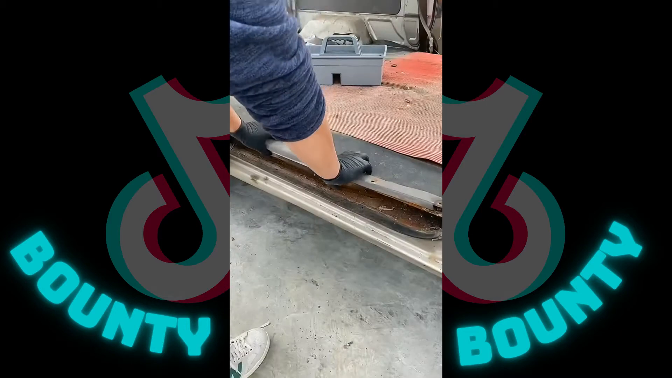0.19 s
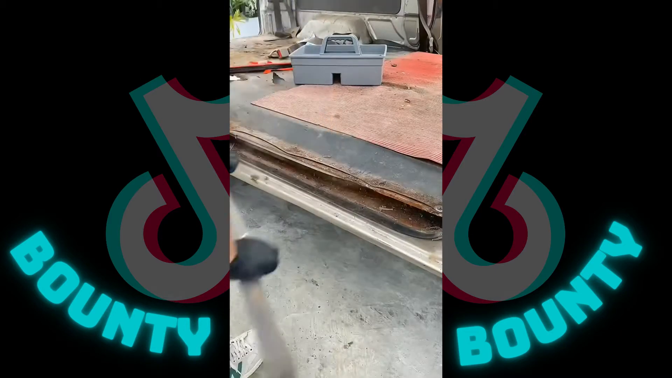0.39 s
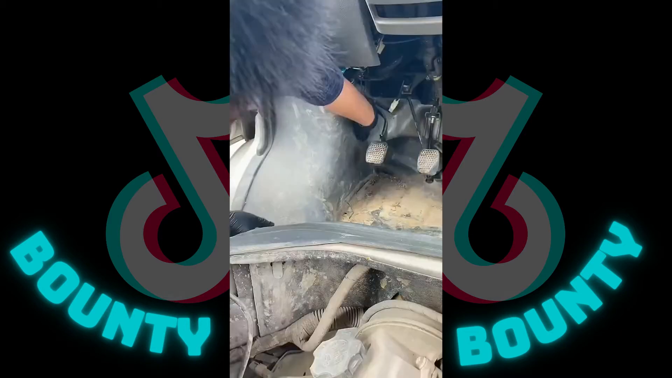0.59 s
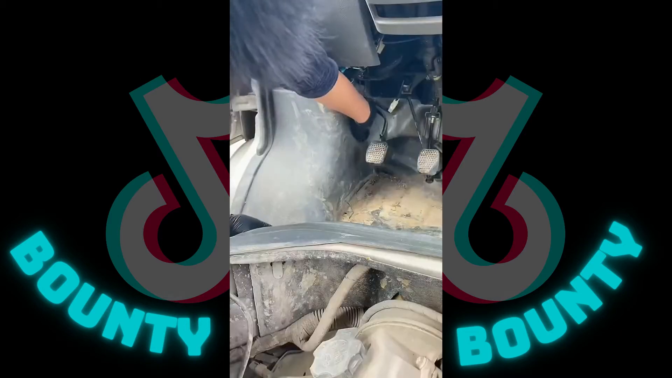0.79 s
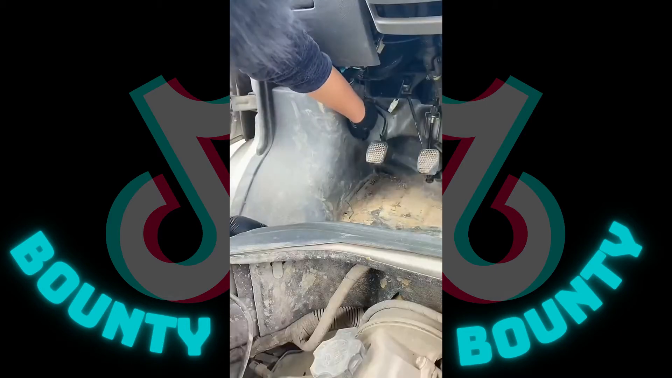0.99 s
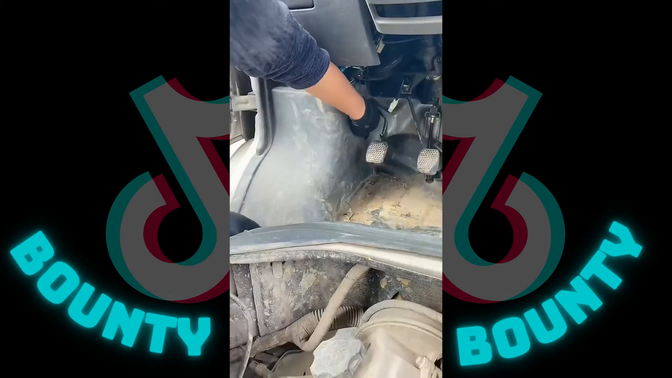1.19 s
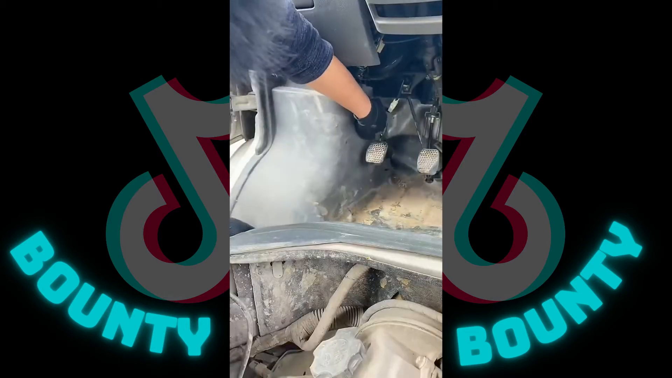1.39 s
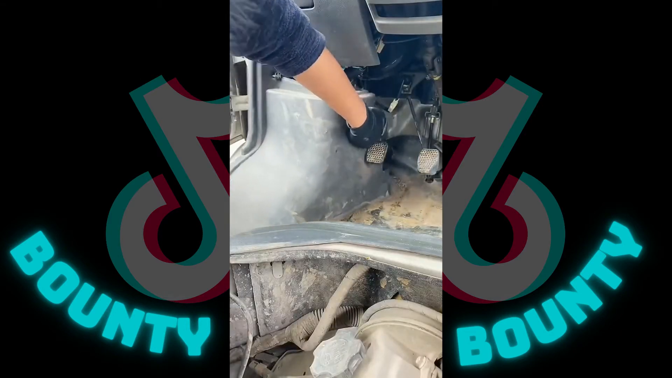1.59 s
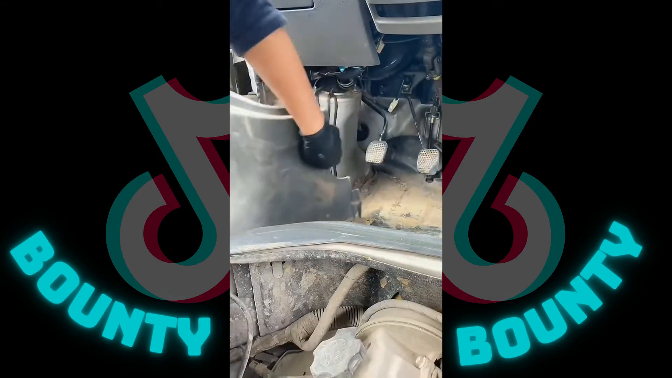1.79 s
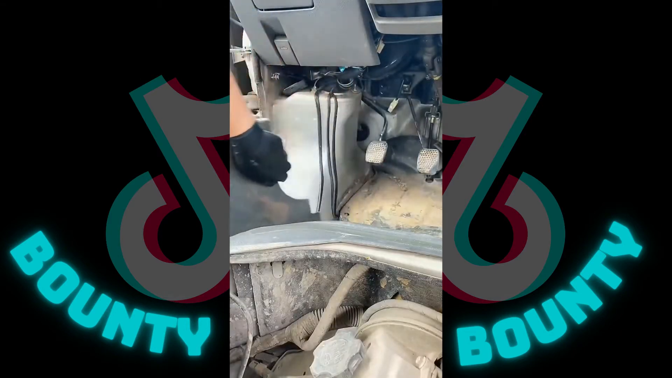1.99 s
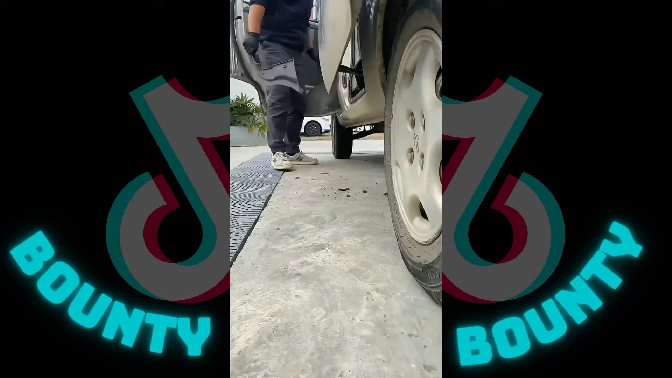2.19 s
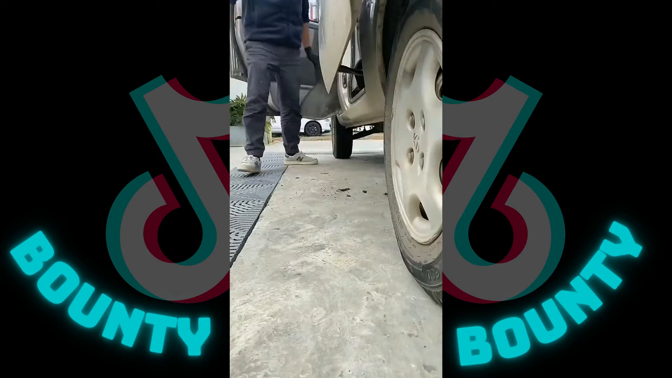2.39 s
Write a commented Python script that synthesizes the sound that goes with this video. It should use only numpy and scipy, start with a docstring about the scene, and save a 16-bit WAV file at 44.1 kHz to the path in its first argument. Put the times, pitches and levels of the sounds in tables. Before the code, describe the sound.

Close phone microphone, three abrupt cuts: hard clacks and a snap from a sill strip, faint scraping before a louder hollow rattle of a freed panel, then a quiet falling boom over low traffic rumble.

```python
"""Three quick shots by a van, heard close, in 2.4 s. First a rusty sill strip is dragged and wrenched off; next a
footwell panel is worked loose with knocks and scraping, then rings hollow once free; last, outdoors, a large
panel is set down on concrete with a boom falling in pitch. Knocks and scraping are noise-like swarms of contacts
filtered by each object's resonances, with sine pings, hums, cracks and creaks; low traffic rumble lies underneath."""
import sys
import numpy as np
from scipy import signal
from scipy.fft import rfft, irfft
from scipy.io import wavfile
from scipy.ndimage import uniform_filter1d

SR = 44100
rng = np.random.default_rng(int(sys.argv[2]) if len(sys.argv) > 2 else 0)


def int16_out(signal):
    """Quantize to a 16-bit WAV file."""
    q = np.round(np.clip(np.atleast_2d(signal).T, -1, 1) * 32767)
    wavfile.write(sys.argv[1], SR, q.astype(np.int16))


N = 105840
STRIP_END_S, PANEL_END_S = .535, 1.985  # the shots change here

# Knocks on the sill strip: (time [s], clack level [dB], thud level [dB], tick level [dB], ping pitch [Hz],
# hum pitch [Hz], attack time constant [s], clack decay to -60 dB [s]); every knock table has these columns
STRIP_KNOCKS = [(0.022, -44.5, -40, -56, 940, 700, 0.0016, 0.12),
                (0.157, -35.5, -36, -44, 910, 490, 0.0034, 0.19),
                (0.185, -37.5, -32.5, -45.5, 2980, 416, 0.0042, 0.34),
                (0.208, -22.5, -22.5, -30, 3190, 410, 0.018, 0.13),
                (0.231, -9, -23, -13.5, 3220, 436, 0.0068, 0.044),
                (0.238, -13.5, -17.5, -31, 1046, 483, 0.00034, 0.16),
                (0.263, -15, -27.5, -27.5, 970, 560, 0.00085, 0.072),
                (0.39, -17.5, -25.5, -33, 1648, 373, 0.003, 0.17),
                (0.425, -15, -25.5, -40.5, 1210, 387, 0.0037, 0.059),
                (0.437, -18.5, -37, -21, 1596, 380, 0.00091, 0.069),
                (0.463, -24.5, -39, -40.5, 1494, 440, 0.0067, 0.071)]
# Scraping of the strip: (time [s], clack level [dB], thud level [dB], tick level [dB], air level [dB]),
# one level per band; every rub table has these columns
STRIP_RUB = [(0.0, -52, -46, -64, -93), (0.174, -66.5, -57, -67.5, -73.5), (0.222, -53.5, -25, -48.5, -86),
             (0.33, -51.5, -36, -58, -64.5), (0.372, -55, -44, -58.5, -63), (0.47, -37, -51.5, -62.5, -73),
             (0.535, -54.5, -33.5, -61, -68)]
# Broad radiation of the strip: (frequency [Hz], density [dB per Hz])
STRIP_COLOUR = [(100, -29.5), (170, -9.5), (260, -11.5), (400, -17.5), (800, -13), (1200, -8),
                (3200, -12.5), (8000, -16)]
# Resonances of the strip: (frequency [Hz], width [Hz], level [dB])
STRIP_MODES = [(162, 45, -8), (342, 98, -8.5), (417, 52, -2.5), (1174, 260, -5.5), (1636, 30, -5),
               (2520, 700, -11), (3186, 140, -8), (4200, 88, -16.5)]


def strip():
    """Forced vibration: knocks and friction excite the modes of the sill strip."""
    return handled(STRIP_KNOCKS, STRIP_RUB, STRIP_COLOUR, STRIP_MODES,
                   ring_db=0.5, air_db=-11.5, start=-1, end=STRIP_END_S)


LOOSE_S = 1.2  # the panel pops free and rings hollow from here
# Knocks on the footwell panel, held and loose: columns as for the strip's knocks
PANEL_KNOCKS = [(0.719, -36, -45, -51, 1540, 214, 0.0024, 0.068),
                (0.811, -36, -40, -44.5, 1030, 513, 0.0036, 0.082),
                (0.828, -36.5, -35, -42.5, 3300, 650, 0.0022, 0.097),
                (0.905, -41.5, -40.5, -79, 1210, 163, 0.0021, 0.044),
                (0.966, -39, -37, -59, 1380, 670, 0.0013, 0.12),
                (0.998, -26.5, -24, -44, 2950, 736, 0.0013, 0.11),
                (1.014, -25, -38, -43, 1266, 173.5, 0.0012, 0.048),
                (1.128, -41.5, -49, -38.5, 1500, 166, 0.003, 0.041),
                (1.204, -11.5, -27.5, -26.5, 1577, 742, 0.0029, 0.079),
                (1.218, -59, -24, -58, 1800, 520, 0.0015, 0.19),
                (1.302, -22, -31, -45, 1595, 477, 0.0042, 0.14),
                (1.448, -58, -57, -19, 1185, 506, 0.0025, 0.061),
                (1.476, -14, -29, -24, 1904, 474, 0.0019, 0.12),
                (1.529, -13.5, -21.5, -32.5, 1280, 691, 0.0022, 0.17),
                (1.549, -19, -30.5, -30.5, 1160, 413, 0.0049, 0.12),
                (1.612, -22.5, -32, -39, 1990, 830, 0.0032, 0.11),
                (1.668, -43, -25, -48, 2020, 502, 0.0022, 0.03),
                (1.708, -13.5, -19.5, -36, 887, 412.5, 0.0048, 0.032),
                (1.765, -18.5, -33, -50, 1630, 800, 0.0068, 0.074),
                (1.792, -14.5, -31, -33, 1417, 560, 0.0061, 0.13),
                (1.832, -29, -39, -41, 1890, 319, 0.0016, 0.11)]
# Resonances of the panel, held and loose: (frequency [Hz], width [Hz], level [dB])
PANEL_MODES = [(208, 83, -5), (499.7, 36, 3), (1092, 15, 1), (2040, 98, -3.5), (2944, 54, -2.5),
               (4400, 45, -5.5)]
# Scraping while held, then while loose: (time [s], clack, thud, tick and air level [dB])
HELD_RUB = [(0.535, -62, -54.5, -66, -75), (0.717, -54, -53.5, -59, -71), (0.801, -55.5, -50.5, -61.5, -70),
            (0.903, -61.5, -46, -67.5, -88), (1.049, -53, -46.5, -61.5, -70), (1.2, -59, -57.5, -62, -69)]
LOOSE_RUB = [(1.2, -41, -28.5, -53, -67), (1.266, -34, -30.5, -43, -46), (1.378, -35.5, -32, -43.5, -70),
             (1.448, -38.5, -36.5, -48, -79), (1.676, -35.5, -33.5, -45, -57.5),
             (1.71, -37, -33, -45.5, -57), (1.818, -40.5, -39.5, -45, -67),
             (1.937, -54.5, -46.5, -64.5, -73), (1.985, -49.5, -43.5, -62, -96)]
# Broad radiation while held, then while loose: (frequency [Hz], density [dB per Hz])
HELD_COLOUR = [(100, -5), (230, -1), (450, -12), (1000, -12.5), (3000, -16), (8000, -25.5)]
LOOSE_COLOUR = [(100, -14), (220, -13.5), (500, -13), (900, -9), (2000, -9), (3300, -14.5), (8000, -24),
                (16000, -28)]


def panel():
    """Boundary conditions: one set of modes, with a weaker share while the panel is held than once free."""
    held = handled(PANEL_KNOCKS, HELD_RUB, HELD_COLOUR, PANEL_MODES,
                   ring_db=-9, air_db=-14, start=STRIP_END_S - .01, end=LOOSE_S + 0.0072)
    loose = handled(PANEL_KNOCKS, LOOSE_RUB, LOOSE_COLOUR, PANEL_MODES,
                    ring_db=-5, air_db=-14, start=LOOSE_S, end=PANEL_END_S)
    return held + loose


# Knocks of the large panel on concrete: columns as for the strip's knocks
GROUND_KNOCKS = [(2.121, -30, -26.5, -49, 1517, 452, 0.001, 0.29),
                 (2.245, -35, -34, -50, 1180, 490, 0.0018, 0.041),
                 (2.256, -34, -32.5, -58, 930, 238, 0.0082, 0.084),
                 (2.377, -32.5, -46, -43.5, 2090, 242, 0.0045, 0.18)]
# Scraping on concrete: (time [s], clack level [dB], thud level [dB], tick level [dB], air level [dB])
GROUND_RUB = [(1.985, -71, -67.5, -121, -114), (2.17, -68, -59.5, -61.5, -71.5),
              (2.297, -67, -43.5, -78, -88), (2.4, -65, -67, -71, -89)]
# Broad radiation of the large panel: (frequency [Hz], density [dB per Hz])
GROUND_COLOUR = [(59, -32), (100, -4), (524, -15), (595, -14.5), (691, -14), (8280, -30), (16000, -46)]
# Resonances of the large panel: (frequency [Hz], width [Hz], level [dB])
GROUND_MODES = [(503, 18, -0.5), (1096, 45, -1.5), (1540, 120, -9.5), (1680, 19, -17), (2700, 69, -11)]


def set_down():
    """Impact excitation: the large panel's modes answer its contacts with the concrete."""
    return handled(GROUND_KNOCKS, GROUND_RUB, GROUND_COLOUR, GROUND_MODES,
                   ring_db=-6, air_db=-18.5, start=PANEL_END_S - .01, end=9)


CREST_DB, THUD_NOISE_DB = 6, -3  # clack peak over rms; noisy share of a thud
THUD_LONGER, TICK_LONGER = 1.69, 0.69  # decay times of thud, and of tick and air, against the clack
PING_DB, PING_T60_S = -2.5, 0.047  # each knock pings at its own pitch
HUM_DB, HUM_CYCLES = 4, 39.6  # the body hums at a low one, for this many cycles to -60 dB
FLICKER_DB = 3.5  # scale of the random level changes in the scraping


def handled(knocks, rub, colour, modes, ring_db, air_db, start, end):
    """Source-filter principle: contact noise drives an object's responses; rows are mid and side."""
    t = np.arange(N) / SR
    push, out = np.zeros((4, N)), np.zeros((2, N))
    slower = np.array([[1], [THUD_LONGER], [TICK_LONGER], [TICK_LONGER]])
    for time, clack_db, thud_db, tick_db, ping_hz, hum_hz, attack, t60 in knocks:
        i = int(time * SR)
        age = t[:min(N - i, SR // 2)]
        rise = 1 - np.exp(-age / max(attack, .0003))
        band_db = np.array([[clack_db - CREST_DB], [thud_db + THUD_NOISE_DB], [tick_db], [tick_db + air_db]])
        push[:, i:i + len(age)] += rise * undb(band_db - 60 * age / max(t60, .005) / slower)
        ping = np.sin(2 * np.pi * ping_hz * age) * undb(clack_db + PING_DB - 60 * age / PING_T60_S)
        hum = np.sin(2 * np.pi * hum_hz * age) * undb(thud_db + HUM_DB - 60 * age * hum_hz / HUM_CYCLES)
        out[0, i:i + len(age)] += rise * (ping + hum)

    rub = np.array(rub, float)
    shared_flicker = walk(150)
    for band, response in enumerate(body(colour, modes, ring_db)):
        flicker_db = FLICKER_DB * (shared_flicker + walk(70)) / 2
        slide = undb(np.interp(t, rub[:, 0], rub[:, band + 1]) + flicker_db)
        push[band] = np.hypot(push[band], slide)  # knocks and scraping add in power
        out += signal.fftconvolve(push[band] * grit(), response[None])[:, :N]
    out[0] += chips(push[0])
    fade_in = np.clip((t - start) / .004, 0, 1)
    fade_out = np.clip((end - t) / .012, 0, 1)
    return out * fade_in * fade_out


# Bands of clack, thud, tick and air: (lower edge [Hz], upper edge [Hz])
BANDS_HZ = [(700, 3500), (110, 700), (3500, 8200), (11500, 16000)]


def body(colour, modes, ring_db):
    """Modal superposition: resonance peaks over a broad colour, one unit-energy response per band."""
    hz = np.fft.rfftfreq(8192, 1 / SR) + 1
    power = shape(colour, size=8192) ** 2
    for mode_hz, width, db in modes:
        power = power + undb(2 * (db + ring_db)) / (1 + (2 * (hz - mode_hz) / width) ** 2) ** 2
    responses = []
    for low, high in BANDS_HZ:
        low_cut = 1 + (low / hz) ** (8 + low // 300)
        high_cut = 1 + (hz / high) ** (8 + high // 300)
        response = causal(np.sqrt(power / low_cut / high_cut))
        responses.append(response / np.sqrt(np.sum(response ** 2)))
    return responses


GRIT_DB = 1.5  # scale of the uneven contact sizes


def grit():
    """Friction as a random process: dense tiny contacts of uneven size, rms 1; rows are mid and side."""
    size_db = GRIT_DB * np.minimum(rng.exponential(size=N), 5)
    x = rng.standard_normal((2, N)) * undb(size_db)
    return x / x.std()


CHIPS_PER_S, CHIP_T60_S, CHIP_HZ = 330, 0.04, (420, 3200)
CHIP_DB, CHIP_SPREAD_DB = -6, 3  # least level against the handling; scale of the random excess above it


def chips(level):
    """Damped free vibration: loose contacts ping at random pitches, following the handling level."""
    out, age = np.zeros(N + 2048), np.arange(2048) / SR
    for when, pitch, size in rng.random((int(CHIPS_PER_S * N / SR), 3)):
        i = int(when * N)
        hz = CHIP_HZ[0] * (CHIP_HZ[1] / CHIP_HZ[0]) ** pitch
        db = CHIP_DB - CHIP_SPREAD_DB * np.log(max(size, .02)) - 60 * age / CHIP_T60_S
        out[i:i + 2048] += level[i] * np.sin(2 * np.pi * hz * age) * undb(db)
    return out[:N]


CRACK_SPREAD, CRACK_RISE = 0.16, 0.04  # pitch step between partials; rise as a share of the decay
# Short hard cracks where a part snaps or lands:
# (time [s], level [dB], centre pitch [Hz], decay to -60 dB [cycles])
CRACKS = [(0.2379, 1, 410, 23.5), (0.389, -13.5, 2590, 87), (0.435, -7.5, 3630, 103),
          (1.793, -17, 2405, 96), (2.119, -25.5, 2870, 75)]


def cracks():
    """Transient release: each crack is three close partials that flare and die within tens of cycles."""
    t, out = np.arange(N) / SR, 0
    for (time, db, hz, cycles), chance in zip(CRACKS, rng.random((len(CRACKS), 2, 3, 1))):
        part = np.clip(t - time, 0, None) * hz / cycles  # age as a share of the decay
        tones = cycles * (1 + CRACK_SPREAD * (np.arange(3)[:, None] - 1.5 + chance[0]))
        flare = (1 - np.exp(-part / CRACK_RISE)) * undb(db - 60 * part)
        partials = np.sin(2 * np.pi * (tones * part + chance[1] / 2))
        out = out + partials.sum(axis=0) / 2 * flare
    return out


CREAK_ROUGH_DB, CREAK_WOBBLE = 3.5, 0.045  # scale of random level [dB] and pitch [ratio] changes
# A rubbed edge holding one resonance:
# (time [s], length [s], start pitch [Hz], end pitch [Hz], level before roughness [dB])
CREAKS = [(0.4, 0.024, 1253, 1107, -24), (1.274, 0.034, 512.5, 523, -20), (1.287, 0.089, 2980, 2280, -32.5),
          (1.296, 0.04, 1542, 1653, -35), (1.348, 0.07, 500, 529, -24.5)]


def creaks():
    """Friction-driven resonance: each creak swells and fades as its pitch glides, wavering and rough."""
    t, out = np.arange(N) / SR, 0
    for time, length, from_hz, to_hz, db in CREAKS:
        part = np.clip((t - time) / length, 0, 1)
        hz = (from_hz + (to_hz - from_hz) * part) * (1 + CREAK_WOBBLE * walk(200))
        swell = np.sqrt(np.abs(np.sin(np.pi * part))) * (part < 1)
        rough = undb(db + CREAK_ROUGH_DB * walk(300))
        out = out + swell * np.sin(2 * np.pi * np.cumsum(hz) / SR) * rough
    return out


BOOM_S, BOOM_DB, BOOM_SWELL_S = 2.122, -26, 0.022  # onset, overall gain, swell time constant
BOOM_FROM_HZ, BOOM_TO_HZ, BOOM_FALL_S = 476.6, 68.3, 0.01588  # fall of the lowest wave, time constant
BOOM_T60_S = 1.2  # of the lowest wave; higher ones die sooner
BOOM_WOBBLE, BOOM_ROUGH_DB = .05, 2.5  # scale of random pitch [ratio] and level changes
# Bending waves of the large panel: (pitch ratio at rest, relative level [dB])
BOOM_WAVES = [(1, -2), (1.9, -4.5), (3.3, -1)]


def boom():
    """Dispersion of bending waves: the landing panel wobbles, highs first and lows late and long."""
    age, out = np.clip(np.arange(N) / SR - BOOM_S, 0, None), 0
    for ratio, db in BOOM_WAVES:
        hz = ratio * BOOM_TO_HZ + (BOOM_FROM_HZ - BOOM_TO_HZ) * np.exp(-age / BOOM_FALL_S)
        hz = hz * (1 + BOOM_WOBBLE * walk(30 * ratio)) * (age > 0)
        fade_db = db - 60 * age * ratio / BOOM_T60_S + BOOM_ROUGH_DB * walk(30 * ratio)
        out = out + np.sin(2 * np.pi * np.cumsum(hz) / SR) * undb(fade_db)
    return out * undb(BOOM_DB) * (1 - np.exp(-age / BOOM_SWELL_S))


# Level of the traffic rumble: (time [s], level [dB])
RUMBLE = [(0.0, -47.5), (1.09, -47), (1.55, -36.5), (2.1, -53.5)]
# Spectrum of the rumble: (frequency [Hz], relative density [dB per Hz])
RUMBLE_COLOUR = [(20, -15), (49, 1.5), (75, 2.5), (110, -11), (170, -6)]


def rumble():
    """Spectral shaping: low traffic and body rumble is Gaussian noise with a low-frequency spectrum."""
    colour = shape(RUMBLE_COLOUR + [(400, -57.5)], size=N)
    x = irfft(rfft(rng.standard_normal(N)) * colour, N)
    level_db = np.interp(np.arange(N) / SR, *np.array(RUMBLE, float).T)
    return x / x.std() * undb(level_db)


def undb(db):
    """Decibel law: level in dB to amplitude gain."""
    return 10 ** (np.asarray(db, float) / 20)


def shape(table, size):
    """Logarithmic frequency scale: gain of (frequency [Hz], level [dB]) points on a transform's bins."""
    hz, db = np.array(table, float).T
    return undb(np.interp(np.log(np.fft.rfftfreq(size, 1 / SR) + 1), np.log(hz), db))


def causal(gain):
    """Minimum phase: folding the cepstrum gives the causal response with this gain."""
    cepstrum = irfft(np.log(gain + 1e-9))
    half = len(cepstrum) // 2
    cepstrum[1:half] *= 2
    cepstrum[half + 1:] = 0
    return irfft(np.exp(rfft(cepstrum)))[:half]


def walk(rate):
    """Smoothed random process: levels held 1 / rate s and slewed twice; spread near 1."""
    hold = int(SR / rate)
    steps = np.repeat(rng.standard_normal(N // 100), hold)[:N]
    return 1.3 * uniform_filter1d(uniform_filter1d(steps, hold), hold)


LEAN_HZ, LEAN = (400, 2500), 0.058  # the mids lean a little to the right
# Side level of the handling against its mid: (frequency [Hz], level [dB])
SIDE_DB = [(60, -35), (200, -22), (380, -13.5), (650, -3), (1300, -7.5), (2400, -9), (4400, -2.5),
           (7500, -11), (12000, -11)]


def scene():
    """Mid-side superposition: three shots in turn; nearby surfaces reach the two ports differently."""
    mid, side = strip() + panel() + set_down()
    side = signal.fftconvolve(side, causal(shape(SIDE_DB, size=2048)))[:N]
    lean = signal.sosfilt(signal.butter(1, LEAN_HZ, "band", fs=SR, output="sos"), mid) * LEAN
    centre = mid + cracks() + creaks() + boom() + rumble()
    return centre + (side - lean) * np.array([[1], [-1]])


def record(dry):
    """Band limitation: the phone drops the deepest bass and cuts the top."""
    dry = signal.sosfilt(signal.butter(2, 32, "high", fs=SR, output="sos"), dry)
    return signal.sosfilt(signal.ellip(10, .2, 80, 16400, fs=SR, output="sos"), dry)


dry = scene()
out = record(dry)
int16_out(out)
```